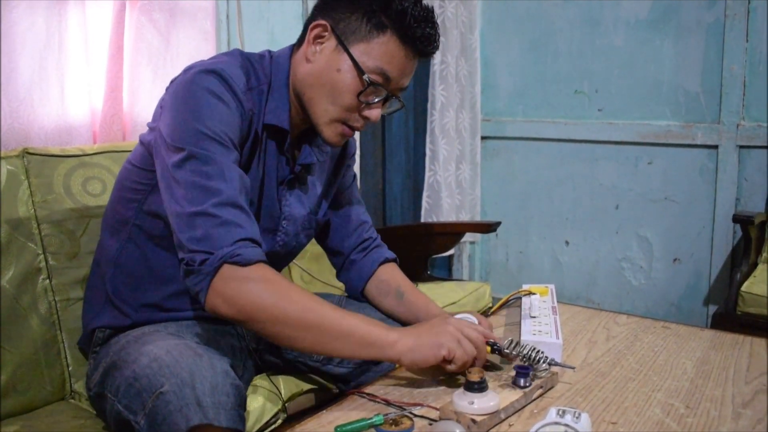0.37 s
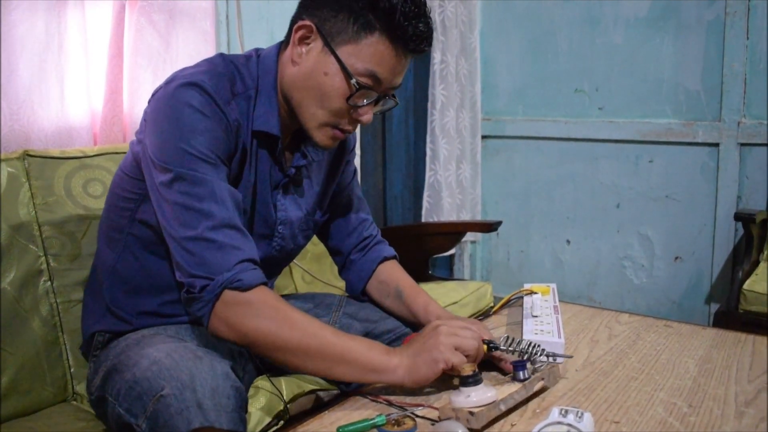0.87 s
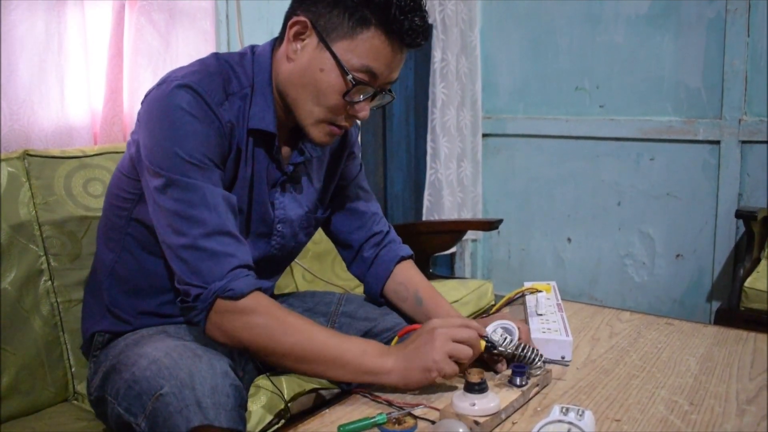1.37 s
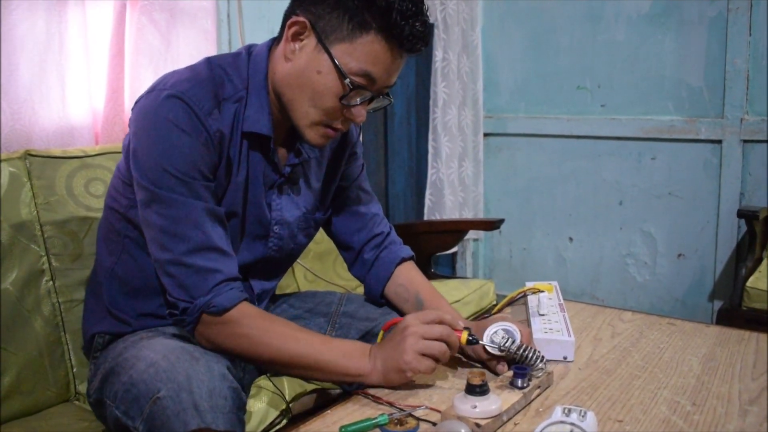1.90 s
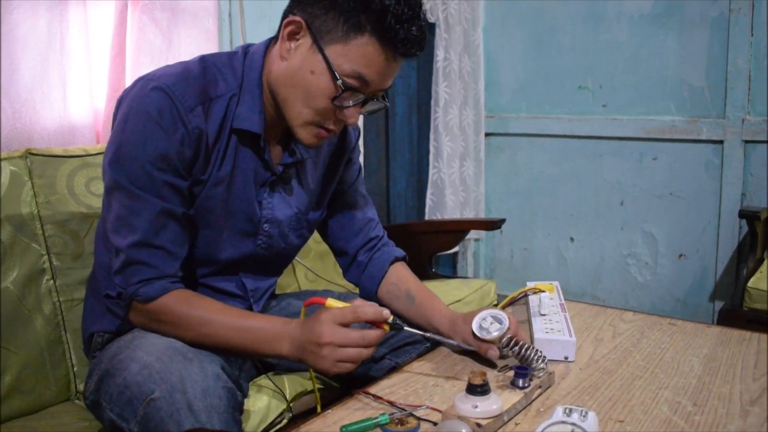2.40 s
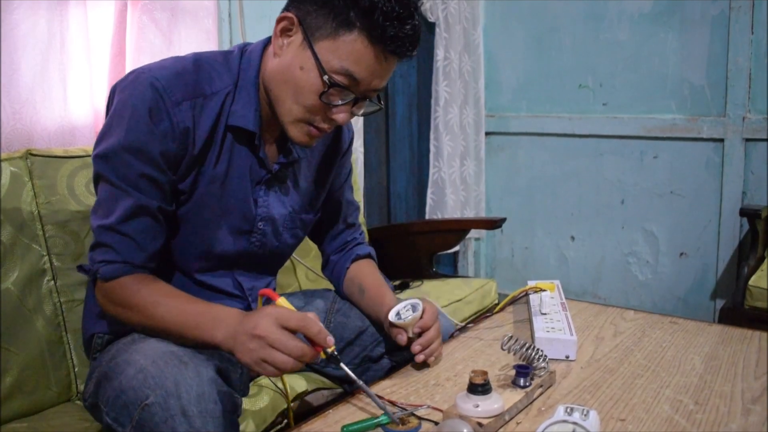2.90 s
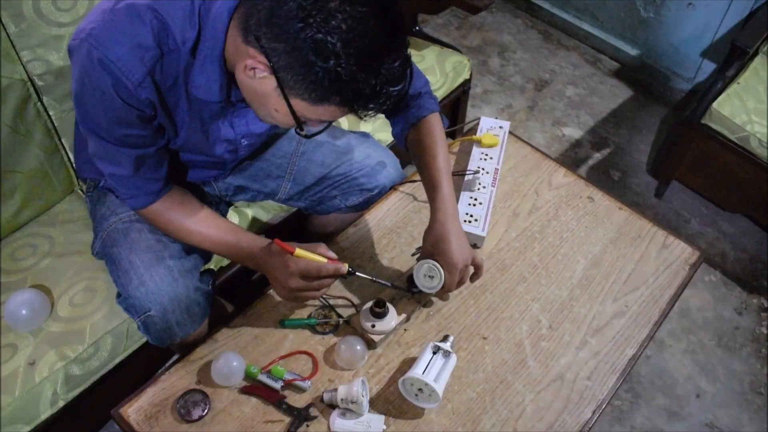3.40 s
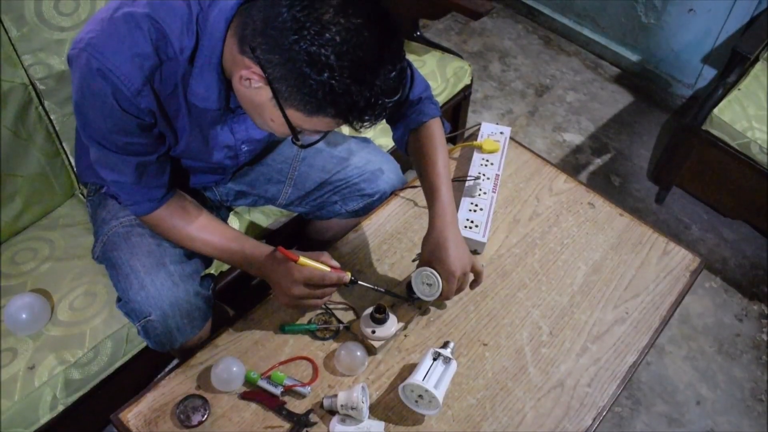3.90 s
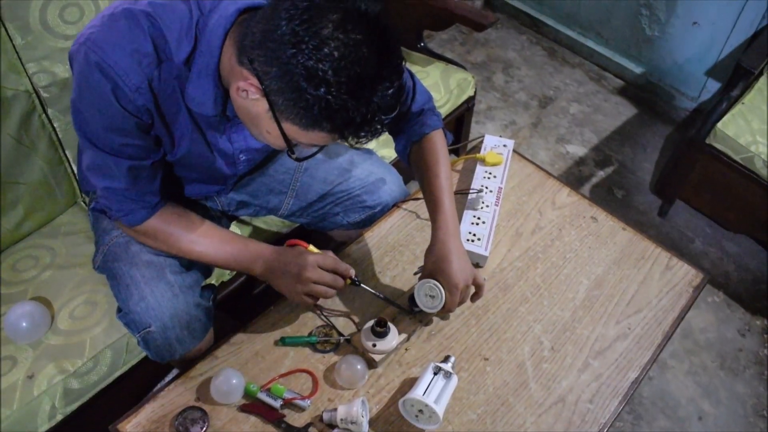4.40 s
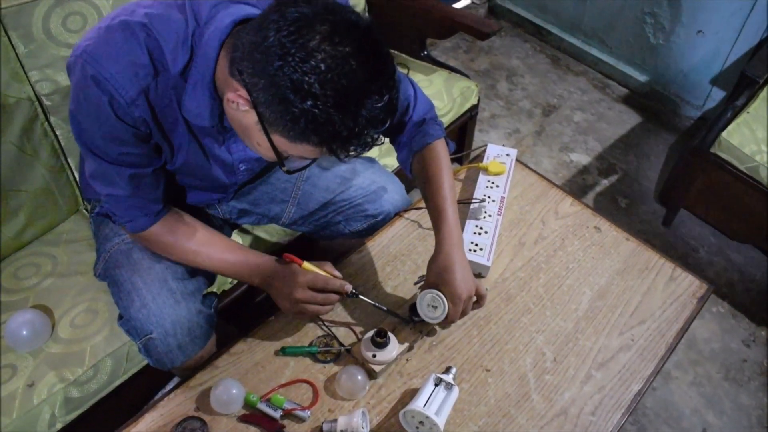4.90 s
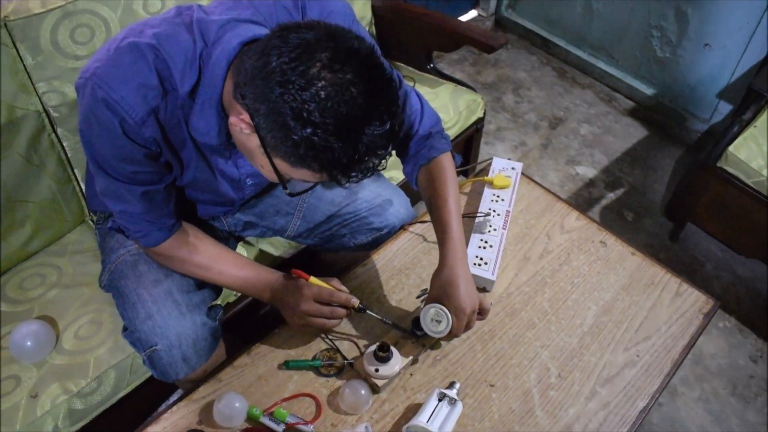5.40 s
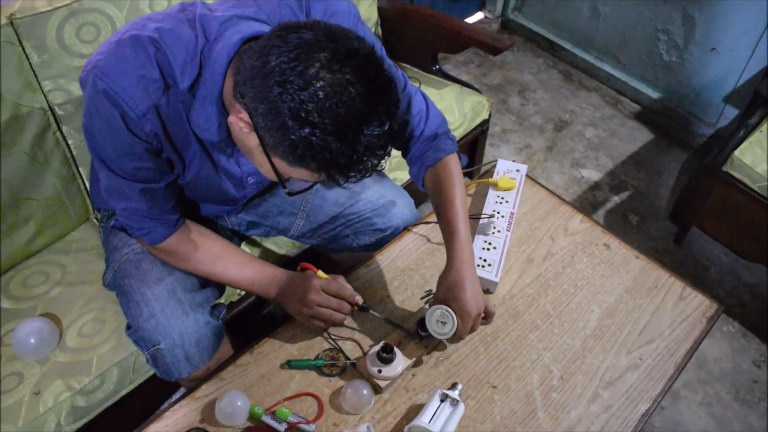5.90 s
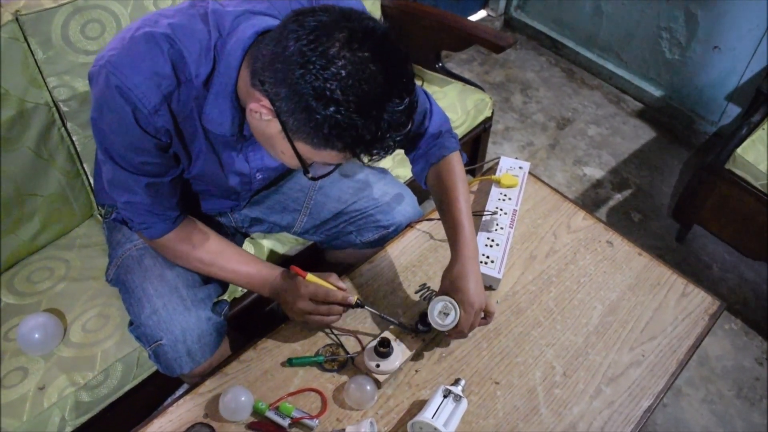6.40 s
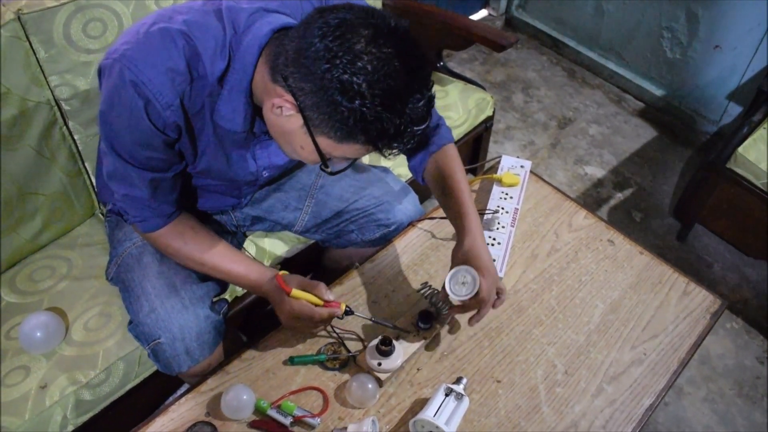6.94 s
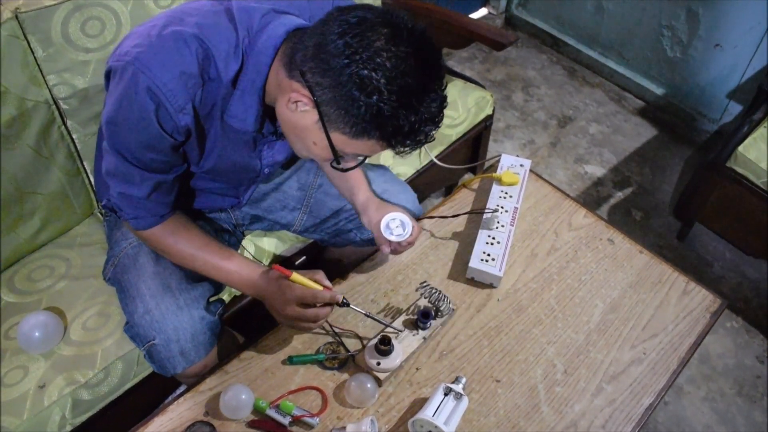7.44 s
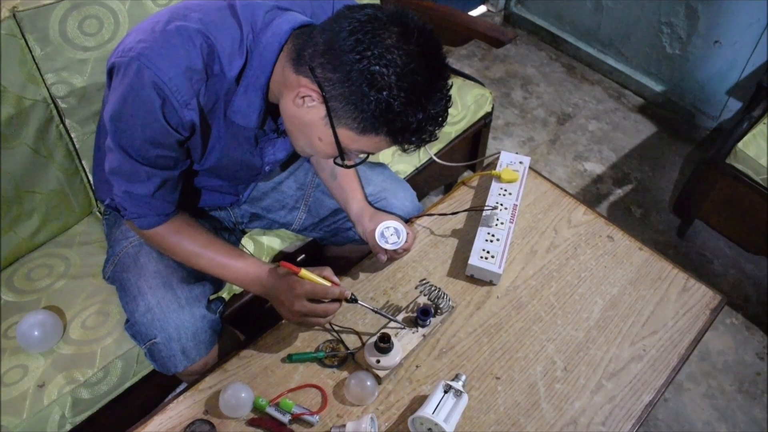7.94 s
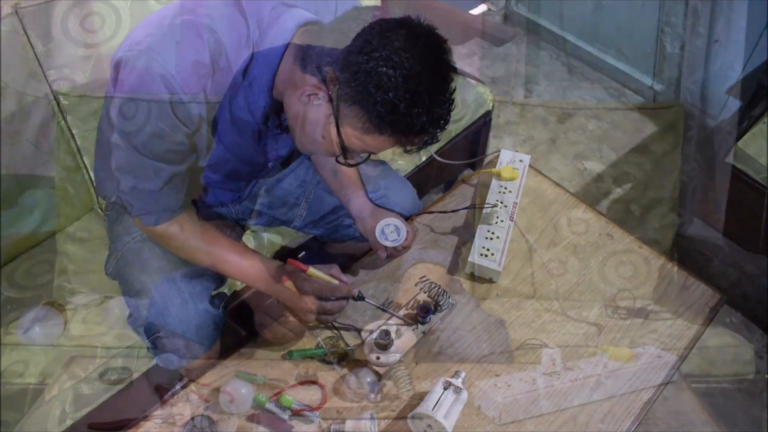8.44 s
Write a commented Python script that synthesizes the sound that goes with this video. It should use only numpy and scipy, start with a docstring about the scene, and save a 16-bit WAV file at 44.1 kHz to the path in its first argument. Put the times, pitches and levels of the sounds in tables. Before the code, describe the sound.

Knocks and bumps on a hollow tabletop, metallic clinks and rattles of a tool on a wire coil, then sparse soft taps over faint hiss.

```python
"""Soldering iron and small lamp handled on a hollow table

Knocks and soft bumps ring modes of the table top and the plastic parts; some, mostly after the mute, add a
sinking thump. The iron clinks and rattles on its coiled wire stand, things drag over the table by stick-slip.
The hot tip sizzles (filtered noise), a thin squeak passes (gliding sine), an edit mutes the sound for a moment.
A small room answers knocks, bumps and clinks, close to one microphone; steady hiss lies under all.
"""
import sys
import numpy as np
from scipy import signal
from scipy.fft import rfft, irfft
from scipy.io import wavfile
from scipy.ndimage import uniform_filter1d

SR = 44100
rng = np.random.default_rng(int(sys.argv[2]) if len(sys.argv) > 2 else 0)


def unload_audio(sound):
    """Save the sound as a 16-bit wav file, at the path given as the first command line argument."""
    columns = np.transpose(np.atleast_2d(sound))
    # keep every value between -1 and 1, then stretch to whole-number steps
    steps = np.round(np.clip(columns, -1, 1) * 32767)
    wavfile.write(sys.argv[1], SR, steps.astype(np.int16))


def voltage_ratio(level):
    """Linear amplitude factor for a level in decibels (scalar or array-like)."""
    return 10 ** (np.asarray(level, float) / 20)


N = 377496
T = np.arange(N) / SR
T_COARSE = T[::64]
MUTE_S = (3.1665, 3.4295)  # start, end
UNEVEN_DB = 3  # no two blows excite the modes alike

# modes of the table top: f/Hz, relative level/dB, nominal t60/s
TABLE = [(103.4, 14, 0.25), (151, -1, 0.99), (203, -5, 0.12), (232, 5.5, 0.11), (257, 3.5, 0.095),
         (303.6, 3, 0.1), (365.3, -7.5, 0.57)]
# modes of the plastic parts: f/Hz, relative level/dB, nominal t60/s
PART = [(511, -7.5, 0.1), (600, 0.5, 0.055), (709.7, -3.5, 0.044), (735, 1, 0.029), (824.6, -3, 0.062),
        (870, 0, 0.04), (954, -2.5, 0.057), (1139, -14.5, 0.1), (1303, 0, 0.022), (1556, 0, 0.013),
        (1805, -1, 0.015)]


def unit(x):
    """Scale to rms 1."""
    return x / np.sqrt(np.mean(x ** 2))


def peak(x):
    """Scale to peak 1."""
    return x / abs(x).max()


def band(x, lo_hz, hi_hz):
    """Butterworth band-pass."""
    return signal.sosfilt(signal.butter(2, [lo_hz, min(hi_hz, .45 * SR)], "band", fs=SR, output="sos"), x)


def add(out, s, x):
    """Mix x in at time s."""
    i = int(s * SR)
    out[i:i + len(x)] += x[:N - i]


def ring(modes, t, near_hz=None, octaves=1, scatter_db=0, shorten=1, detune=0):
    """Answer of a body to one blow: decaying sines; modes near the struck spot sound strongest."""
    hz, db, t60 = np.transpose(modes)[:, :, None]
    chance = rng.standard_normal((2, len(modes), 1))
    if near_hz:
        db = db - 6 * (np.log2(hz / near_hz) / octaves) ** 2
    gain = voltage_ratio(db + scatter_db * chance[0] - 60 * t / (t60 * shorten))
    tones = np.sin(2 * np.pi * hz * (1 + detune * chance[1]) * t)
    return np.sum(gain * tones, axis=0)


def grit(rate_hz, spread_db):
    """Stick-slip: random small jolts of very uneven size."""
    jolts = rng.random(N) < rate_hz / SR
    return jolts * voltage_ratio(spread_db * rng.exponential(size=N)) * rng.standard_normal(N)


def strokes(rows, column, rise_s, fall_s):
    """Gain of each stroke: swells, holds for its length, dies away; rise and fall are times per 10 dB."""
    rows = np.array(rows)
    s, length_s, db = rows[:, [0, 1, column]].T[:, :, None]
    early_s = np.maximum(s - T_COARSE, 0)
    late_s = np.maximum(T_COARSE - s - length_s, 0)
    return voltage_ratio(db - 10 * early_s / rise_s - 10 * late_s / fall_s)


def total(gains):
    """Gain of the strokes summed in power, at every sample."""
    return np.interp(T, T_COARSE, np.sqrt(np.sum(gains ** 2, axis=0)))


def blow(table_db, table_hz, part_db, part_hz, contact_s, damping):
    """Table and part ring together, first cycles strongest; damping shortens the ring."""
    t = T[:int(.3 * SR)]
    table = ring(TABLE, t, table_hz, octaves=0.51, scatter_db=UNEVEN_DB, shorten=1 / damping)
    table = table * (0.26 + np.exp(-t / 0.013))
    part = ring(PART, t, part_hz, octaves=0.31, scatter_db=UNEVEN_DB, shorten=1 / damping, detune=0.026)
    part = part * (.5 + np.exp(-t / 0.011))
    # a softer contact spreads the push in time
    swell = 1 - np.exp(-(t / contact_s) ** 2)
    # the surface first moves away from the microphone
    return -(voltage_ratio(table_db) * peak(table * swell) + voltage_ratio(part_db) * peak(part * swell))


def knocks():
    """Hard blows: brief contact, body ring and a short bright tick of noise."""
    # t/s, table level/dB, part level/dB, part size as f/Hz, tick level/dB
    hits = [(0.009, -35, -39.5, 511, -45.5), (0.128, -37, -39, 720, -54), (0.24, -40.5, -42.5, 825, -54),
            (0.447, -42, -44, 576, -46.5), (0.477, -28.5, -30.5, 794, -43), (0.53, -24, -11.5, 600, -19.5),
            (1.038, -55, -48, 659, -38.5), (1.058, -8, -6, 755, -24), (1.307, -28, -26, 940, -37.5),
            (1.392, -27.5, -25, 944, -37.5), (1.468, -51, -49, 557, -42.5), (1.493, -37, -26.5, 900, -65),
            (1.617, -31, -29.5, 845, -42), (1.898, -24.5, -31, 780, -38), (2.016, -24, -23, 953, -56),
            (2.211, -27, -31, 780, -49), (2.891, -46.5, -39.5, 716, -44), (3.013, -52.5, -24, 530, -25.5),
            (3.78, -55, -66, 931, -47), (3.902, -21.5, -29, 940, -50), (4.514, -23.5, -31, 656, -39.5),
            (4.714, -49, -48, 560, -39), (4.95, -35.5, -45, 460, -40), (5.647, -45.5, -45.5, 1310, -58),
            (6.101, -24.5, -27.5, 650, -66), (8.144, -23.5, -29.5, 620, -50)]
    # before and after the mute; a hand rests on the table
    spot_hz, damping = (240, 280), (0.79, 1.35)
    out = np.zeros(N)
    t = T[:int(.06 * SR)]
    for s, table_db, part_db, part_hz, tick_db in hits:
        late = int(s > MUTE_S[0])
        body = blow(table_db, spot_hz[late], part_db, part_hz, contact_s=0.00062, damping=damping[late])
        add(out, s, body)
        crumbs = 0.23 * np.exp(-t / 0.0085) * rng.exponential(size=len(t))
        grains = rng.standard_normal(len(t)) * (np.exp(-t / 0.00067) + crumbs)
        crack = band(grains, 1300, 5500) + .13 * band(grains, 5500, 15000)
        add(out, s, voltage_ratio(tick_db) * peak(crack))
    return out


def bumps():
    """Soft bumps of hand and rocking parts: long contact, strong damping, no tick."""
    # t/s, table level/dB, spot on the table as f/Hz, part level/dB, part size as f/Hz
    soft_hits = [(0.07, -38.5, 250, -44.5, 764), (0.533, -21.5, 361, -16.5, 602),
                 (0.722, -49, 400, -39.5, 670), (0.833, -49, 251, -43.5, 670), (1.08, -22, 211, -46, 767),
                 (2.688, -56, 437, -42, 646), (3.019, -37, 405, -25, 660), (3.055, -32.5, 428, -26.5, 610),
                 (3.078, -34.5, 437, -27, 513), (3.095, -43.5, 410, -34.5, 567),
                 (4.049, -57, 312, -47, 500), (4.083, -41, 326, -41, 530), (4.977, -44, 217, -42.5, 450),
                 (5.003, -46, 225, -44, 595), (5.392, -32.5, 215, -50.5, 1010),
                 (5.424, -37.5, 270, -53, 700), (5.853, -37.5, 373, -50, 450),
                 (6.278, -43, 245, -42.5, 585), (7.168, -44, 258, -51, 527)]
    out = np.zeros(N)
    for s, *body in soft_hits:
        add(out, s, blow(*body, contact_s=0.0041, damping=3.2))
    return out


def thumps():
    """The whole table gives way under some blows and bumps: a low swing or two that sinks in pitch."""
    # t/s, peak level/dB
    low_swings = [(1.058, -29.5), (3.902, -41), (4.513, -48), (4.95, -53), (5.392, -45), (5.854, -47),
                  (6.101, -40.5), (6.861, -53), (7.169, -43), (7.411, -50), (8.143, -35)]
    start_hz, sag_hz, decay_s = 161, 68, .025
    out = np.zeros(N)
    t = T[:int(.15 * SR)]
    hz = sag_hz + (start_hz - sag_hz) * np.exp(-t / 0.012)
    swing = np.sin(2 * np.pi * np.cumsum(hz) / SR) * np.exp(-t / decay_s)
    for s, db in low_swings:
        add(out, s, -voltage_ratio(db) * peak(swing))
    return out


def wire(contact, scrape, shorten):
    """High and low ring of the coil under a given contact; part of the high sound is plain scrape."""
    # high modes of the coil: f/Hz, relative level/dB, nominal t60/s
    high_modes = [(6370, -19.5, 0.063), (7890, -9, 0.14), (8900, 1.5, 0.03), (9550, 0, 0.026),
                  (10300, -3, 0.027), (11430, 0, 0.038), (11060, 5.5, 0.014), (12500, -17, 0.028),
                  (12450, -8, 0.026), (13540, -13, .05), (14140, -4, 0.016)]
    # low modes of the coil: f/Hz, relative level/dB, nominal t60/s
    low_modes = [(3375, -2.5, 0.057), (3790, -14, .015), (3900, 5, 0.0053), (4415, 3, 0.022),
                 (4630, -7, 0.033)]
    t = T[:int(.08 * SR)]

    def excite(modes):
        """Drive the modes with the contact noise."""
        answer = ring(modes, t, scatter_db=UNEVEN_DB, shorten=shorten)
        return unit(signal.fftconvolve(contact, answer)[:len(contact)])

    high = excite(high_modes) + scrape * unit(band(contact, 6800, 14600))
    return unit(high), excite(low_modes)


def clinks():
    """Iron strikes the coil, later its tip ticks on the lamp: a sharp contact scrapes on for a few ms."""
    # t/s, high peak level/dB, low ring peak level/dB, scrape decay/s (floored at 1 ms)
    strikes = [(0.6, -42.5, -56, .005), (1.071, -34.5, -41, 0.012), (1.822, -42, -38, .0035),
               (1.8416, -28, -32.5, 0.0027), (1.8983, -30.5, -31, 0.01), (1.944, -32, -35.5, 0.015),
               (1.969, -25.5, -57, .004), (1.991, -38, -43, .0045), (2.0178, -12, -23.5, 0.0063),
               (2.042, -26, -29, 0.0029), (2.123, -38, -34, 0.0039), (2.159, -29, -30.5, 0.006),
               (2.2124, -20.5, -27, 0.0048), (2.236, -25.5, -40, 0.011), (2.272, -36, -43, .003),
               (2.297, -34, -41, .003), (3.0144, -30.5, -27.5, 0.0007), (4.642, -49, -59, .005),
               (4.665, -44, -53, 0.006), (5.394, -47.5, -49, .002), (5.8666, -50.5, -56, 0.0061),
               (6.148, -53, -55.5, 0.0065), (6.408, -51, -70, .005)]
    out = np.zeros(N)
    t = T[:int(.06 * SR)]
    for s, high_db, low_db, decay_s in strikes:
        contact = rng.standard_normal(len(t)) * np.exp(-t / max(decay_s, .001))
        high, low = wire(contact, scrape=1.1, shorten=.4)
        add(out, s, voltage_ratio(high_db) * peak(high) + voltage_ratio(low_db) * peak(low))
    return out


def rattle():
    """The iron slides along the coil: small quick contacts on the wire."""
    # t/s, length/s, high level/dB, low ring level/dB
    slides = [(1.54, 0.069, -63.5, -60), (1.72, .1, -64, -65), (1.91, 0.046, -52, -53.5),
              (2.0, 0.11, -52, -51.5), (2.17, 0.019, -55.5, -52), (2.22, 0.032, -58.5, -48)]
    rise_s, fall_s = 0.013, 0.033
    high, low = wire(grit(2000, spread_db=2.5), scrape=.8, shorten=.4)
    high = high * total(strokes(slides, 2, rise_s, fall_s))
    low = low * total(strokes(slides, 3, rise_s, fall_s))
    return high + low


def fidget(db):
    """Restless hands between strokes: gain that wanders a few times a second about a low level."""
    wander_db = 3.5
    steps = rng.standard_normal(60)
    return voltage_ratio(db + wander_db * np.interp(T, np.linspace(0, T[-1], len(steps)), steps))


def dragging():
    """Dense stick-slip jolts excite table and parts; skin, sleeve and cable add a smooth swish."""
    # things dragged: t/s, length/s, table level/dB, spot on the table as f/Hz, part level/dB
    drags = [(0.0, 0.028, -47, 191, -53.5), (0.58, 0.029, -46, 257, -47), (0.86, 0.062, -56.5, 218, -62),
             (1.0, 0.26, -48, 222, -58), (1.3, .15, -52, 222, -62), (1.5, 0.39, -37.5, 246, -51),
             (1.9, 0.39, -36.5, 235, -42.5), (2.4, 0.27, -56, 192, -61), (2.9, 0.03, -56, 193, -58.5),
             (3.03, 0.1, -53, 383, -52.5), (3.6, 0.24, -64, 233, -75), (4.08, 0.041, -44, 355, -63),
             (4.17, 0.16, -54, 338, -70.5), (4.66, 0.013, -53, 240, -64), (4.73, 0.039, -54, 240, -60),
             (4.87, 0.024, -56, 238, -85), (4.98, 0.029, -54, 240, -57.5), (5.23, 0.18, -67, 224, -82),
             (5.9, 0.12, -52.5, 218, -63.5), (6.17, 0.17, -52, 216, -59), (6.42, 0.044, -45, 232, -56.5),
             (6.56, 0.04, -55.5, 229, -67), (6.9, 0.048, -59, 254, -72), (7.34, 0.12, -58, 222, -68),
             (8.29, 0.068, -61, 203, -72), (8.5, .06, -58, 232, -66)]
    # brushing: t/s, length/s, level/dB
    brushes = [(0.0, 0.023, -66.5), (0.55, 0.041, -59), (1.08, 0.044, -58), (1.38, 0.031, -62.5),
               (1.86, 0.47, -58), (2.48, 0.22, -60), (3.0, 0.081, -63.5), (3.76, 0.26, -71.5),
               (4.5, 0.14, -77), (4.97, 0.024, -69), (6.15, 0.18, -66), (8.17, 0.42, -68)]
    rise_s, fall_s = 0.052, .06
    push = strokes(drags, 2, rise_s, fall_s)
    # the table is rubbed where the strongest stroke is
    spot_hz = np.interp(T, T_COARSE, np.array(drags)[push.argmax(0), 3])
    spot_hz = uniform_filter1d(spot_hz, size=1500)
    t = T[:SR // 3]
    soft = 1 - np.exp(-t / .004)  # rubbing pushes gently, without a click

    jolts = grit(700, spread_db=2.2)
    table, power = 0, 0
    for hz, db, t60 in TABLE:
        octaves = 0.9 if hz < 170 else 0.45
        gain = voltage_ratio(db - 6.95 * (np.log2(hz / spot_hz) / octaves) ** 2)
        answer = ring([(hz, 0, t60)], t, shorten=0.74) * soft
        table = table + gain * unit(signal.fftconvolve(jolts, answer)[:N])
        power = power + gain ** 2
    table = table / np.sqrt(power)

    answer = ring(PART, T[:SR // 8], shorten=1.2) * soft[:SR // 8]
    part = unit(signal.fftconvolve(grit(1200, spread_db=2), answer)[:N])
    swish = unit(band(grit(6000, spread_db=1.4), 1100, 13000))

    table_gain = np.hypot(total(push), fidget(-69.5))
    part_gain = np.hypot(total(strokes(drags, 4, rise_s, fall_s)), fidget(-76.5))
    swish_gain = np.hypot(total(strokes(brushes, 2, rise_s, fall_s)), fidget(-73.5))
    return table_gain * table + part_gain * part + swish_gain * swish


def sizzle():
    """The hot tip meets flux: a rising hiss with a few broad peaks."""
    # envelope: t/s, level/dB
    envelope = [(3.075, -73), (3.161, -39), (3.168, -41)]
    # noise peaks: f/Hz, width/Hz, relative level/dB
    peaks = [(4970, 1240, -2.5), (9300, 1500, 2.5), (11200, 1000, 1), (13600, 1390, 6.5)]
    noise = rng.standard_normal(N)
    x = sum(voltage_ratio(db) * band(noise, hz - width / 2, hz + width / 2) for hz, width, db in peaks)
    s, db = np.transpose(envelope)
    return unit(x) * voltage_ratio(np.interp(T, s, db)) * (T > s[0]) * (T < s[-1])


def squeak():
    """A thin whistle: one sine of wandering pitch and level."""
    # t/s, f/Hz, rms level/dB
    track = [(0.64, 8683, -81), (0.659, 8044, -78), (0.728, 8003, -81), (0.8, 8667, -69),
             (0.834, 8035, -72), (0.85, 8158, -69)]
    s, hz, db = np.transpose(track)
    gain = uniform_filter1d(np.interp(T, s, voltage_ratio(db), 0, 0), size=400)
    phase = 2 * np.pi * np.cumsum(np.interp(T, s, hz)) / SR
    return np.sqrt(2) * gain * np.sin(phase)


def room(x):
    """Dense reflections: decaying noise per band, the topmost band dying first."""
    # f/Hz, t60/s, relative level/dB
    bands = [(165, 0.28, -7.5), (600, 0.27, -14), (1840, 0.4, -7.5), (6260, 0.48, -18.5),
             (12100, .12, -20.5)]
    t = T[:int(.4 * SR)]
    tail = 0
    for hz, t60, db in bands:
        noise = band(rng.standard_normal(len(t)), hz / 1.41, hz * 1.475)
        noise = noise * voltage_ratio(-60 * t / t60) * (1 - np.exp(-t / 0.0013))
        # level refers to the direct energy in a wider band
        direct = np.sum(band(signal.unit_impulse(len(t)), hz / 2.15, hz * 6.86) ** 2)
        tail = tail + voltage_ratio(db) * np.sqrt(direct / np.sum(noise ** 2)) * noise
    return x + signal.fftconvolve(x, tail)[:N]


def hiss():
    """Steady noise of room and microphone, shaped in the spectrum."""
    # f/Hz, relative density/dB
    spectrum = [(15, -38.5), (25, -10.5), (53, -1), (153, -6.5), (200, -7), (242, -19), (301, -5),
                (439, -11.5), (560, -12), (1100, -20.5), (1260, -20.5), (14800, -28), (16000, -28)]
    rms_db = -62
    hz, db = np.transpose(spectrum)
    f = np.maximum(np.fft.rfftfreq(N, 1 / SR), 1)
    gain = voltage_ratio(np.interp(np.log(f), np.log(hz), db))
    return voltage_ratio(rms_db) * unit(irfft(rfft(rng.standard_normal(N)) * gain, N))


def scene():
    """One microphone, deaf to the deep bass of the handling, copied to both channels."""
    handling = room(knocks() + bumps() + clinks()) + dragging() + rattle()
    handling = signal.sosfilt(signal.butter(4, 75, "high", fs=SR, output="sos"), handling)
    mono = handling + thumps() + sizzle() + squeak() + hiss()
    return np.array([mono, mono])


def roll_off(x):
    """The treble ends steeply here."""
    return signal.sosfilt(signal.butter(12, 16640, fs=SR, output="sos"), x)


def record(dry):
    """Nearly mono: a very faint side signal is added; the edit mutes the sound, the top is cut."""
    smear = unit(rng.standard_normal(256)) / 16  # unit-energy filter
    side = voltage_ratio(-70) * band(rng.standard_normal(N), 800, 15500)
    side = side + voltage_ratio(-42) * signal.fftconvolve(dry[0], smear)[:N]
    side = side + voltage_ratio(-65.5) * band(rng.standard_normal(N), 20, 110)
    audible = (T < MUTE_S[0]) | (T > MUTE_S[1])
    x = (dry + side * np.array([[1], [-1]])) * audible
    x = signal.sosfilt(signal.ellip(6, .2, 30, 15300, fs=SR, output="sos"), x)
    return roll_off(x)


dry = scene()
out = record(dry)
unload_audio(out)
```